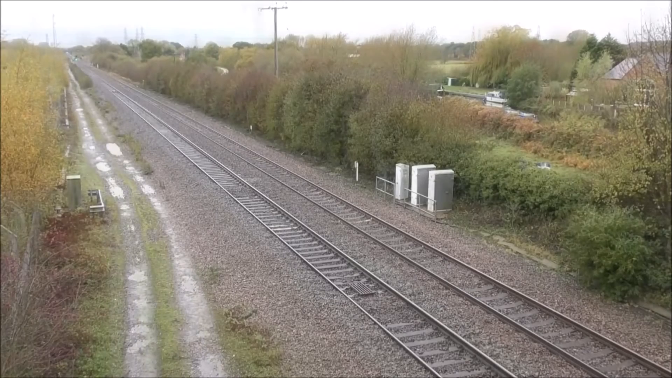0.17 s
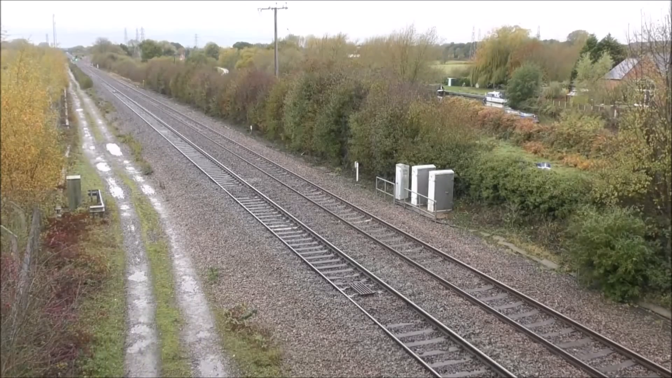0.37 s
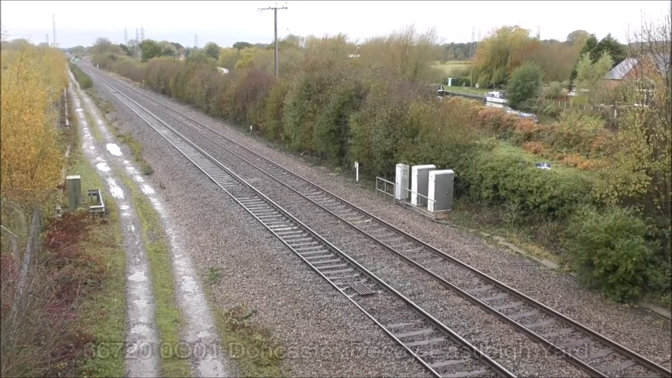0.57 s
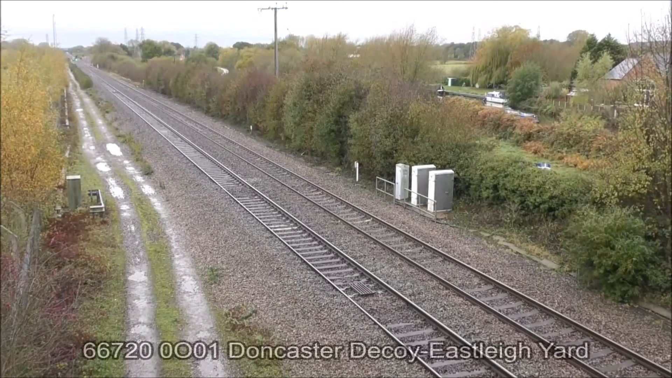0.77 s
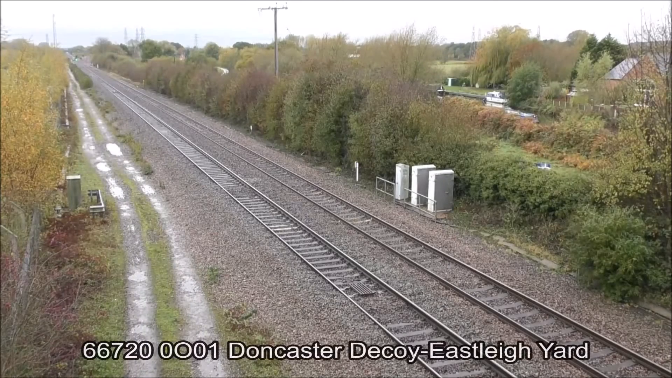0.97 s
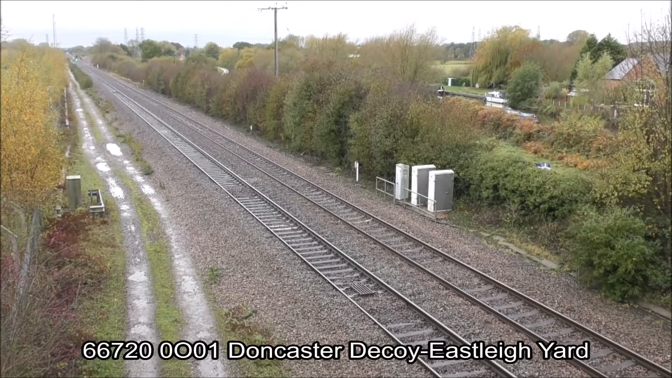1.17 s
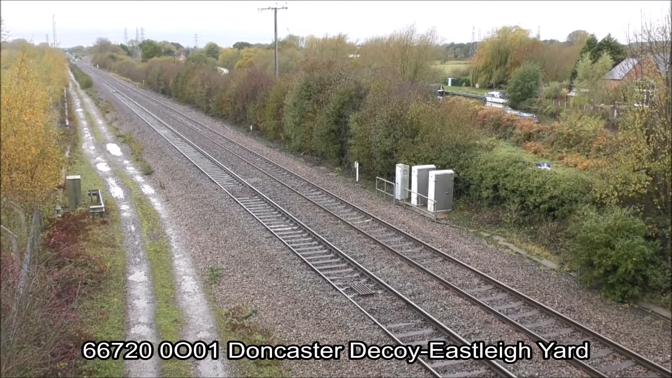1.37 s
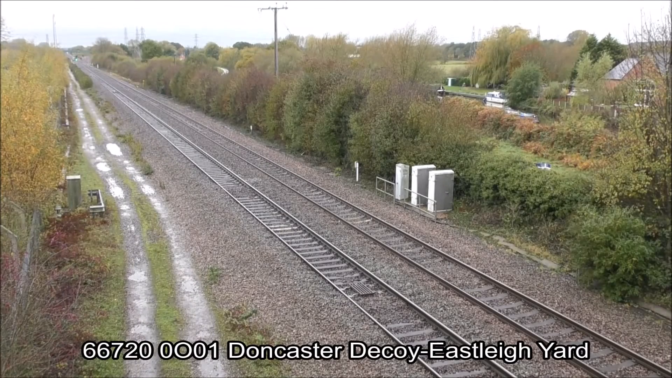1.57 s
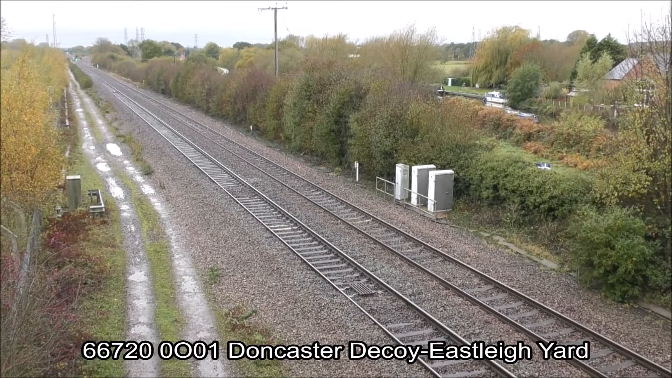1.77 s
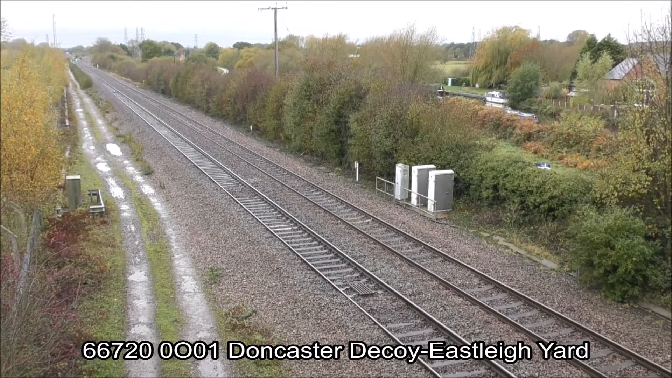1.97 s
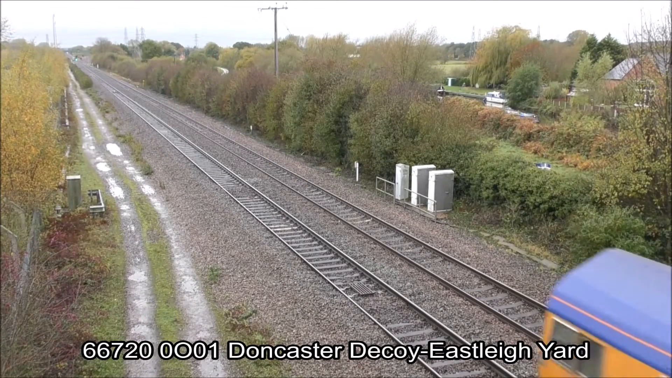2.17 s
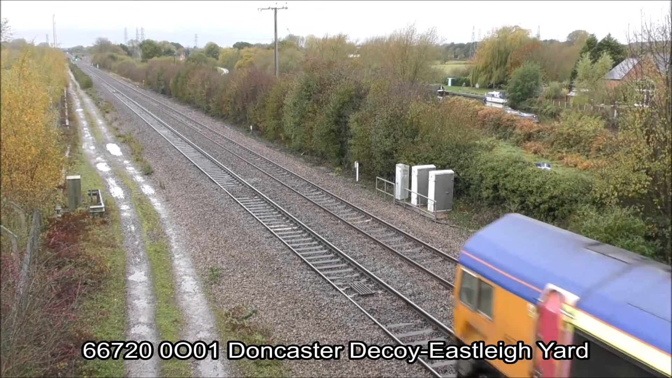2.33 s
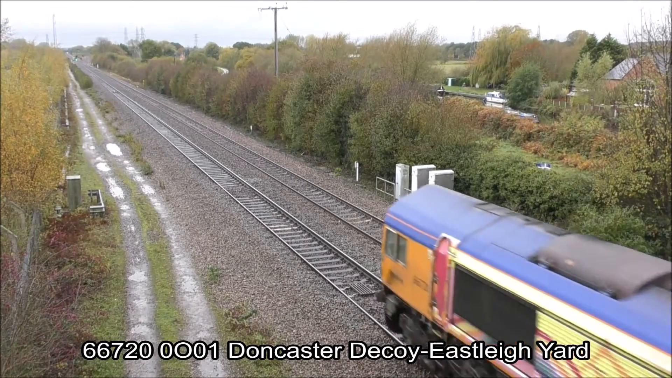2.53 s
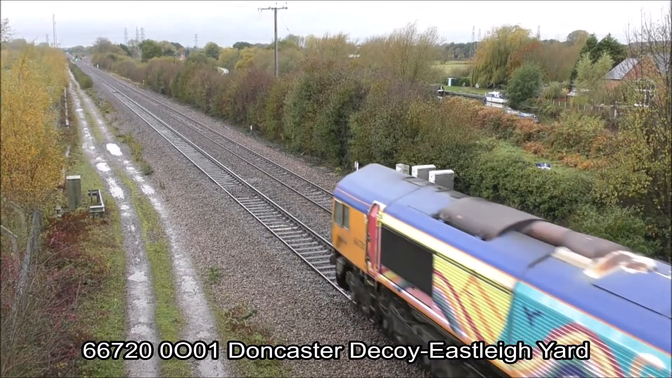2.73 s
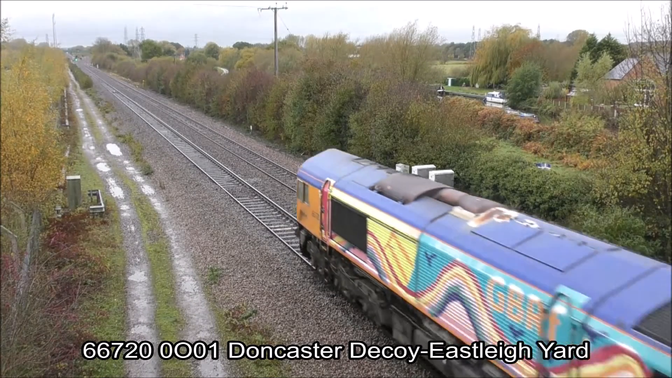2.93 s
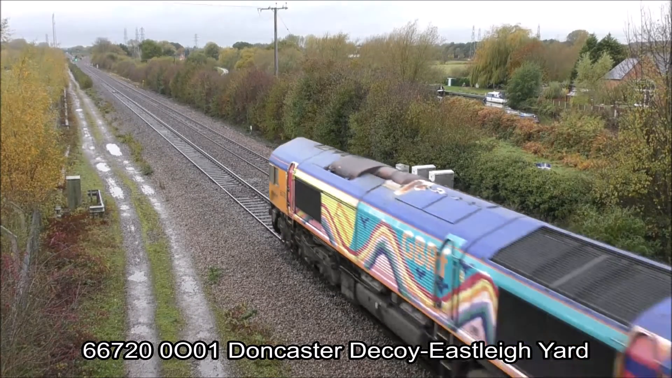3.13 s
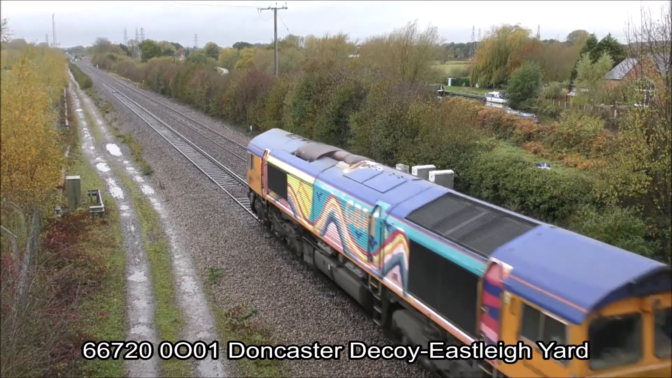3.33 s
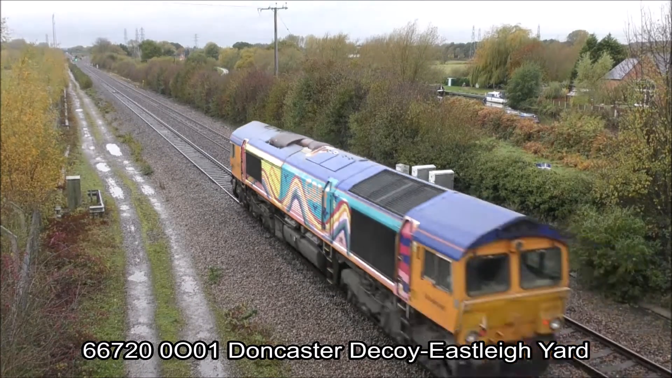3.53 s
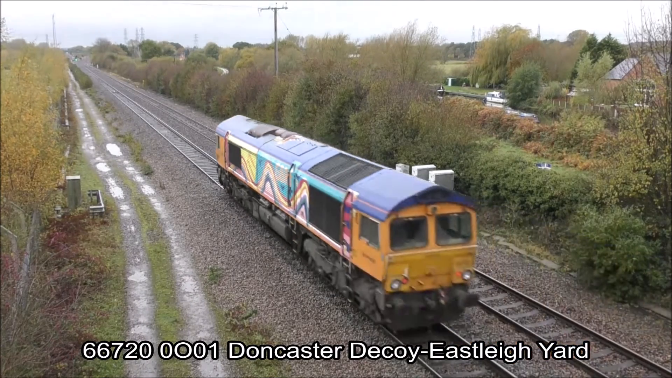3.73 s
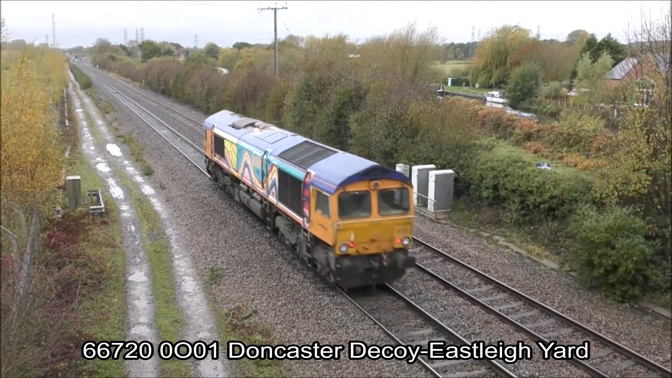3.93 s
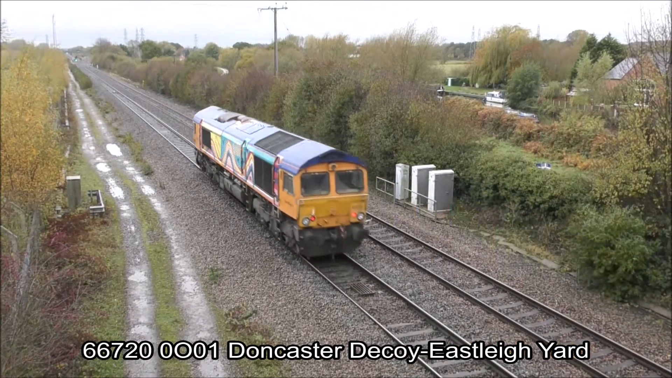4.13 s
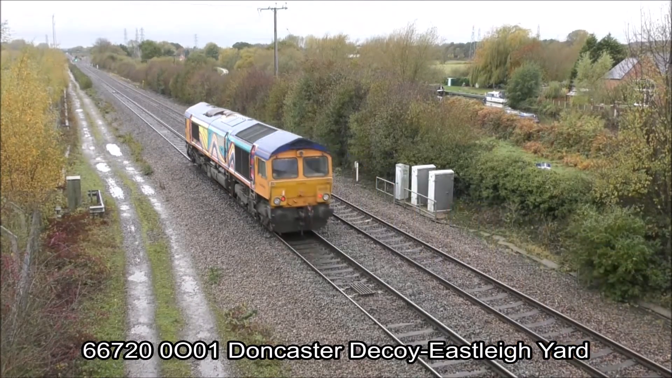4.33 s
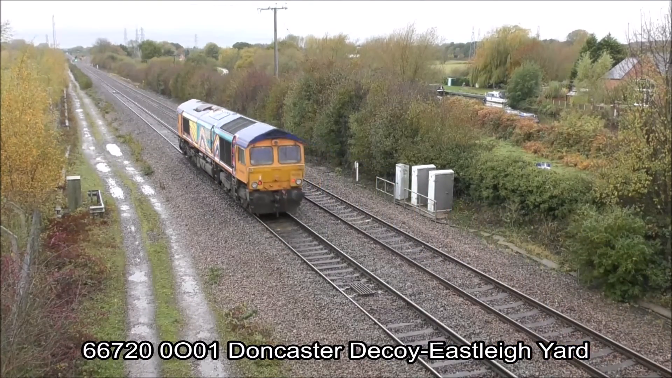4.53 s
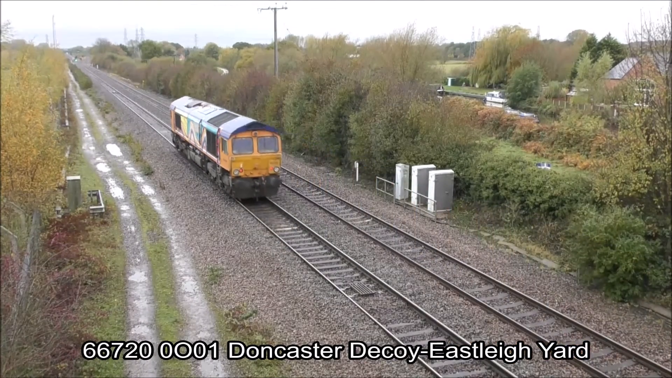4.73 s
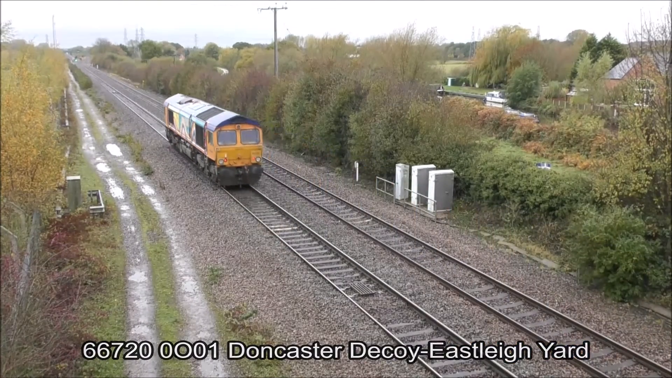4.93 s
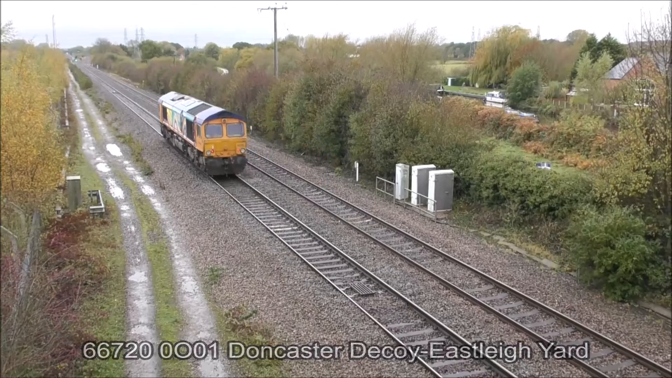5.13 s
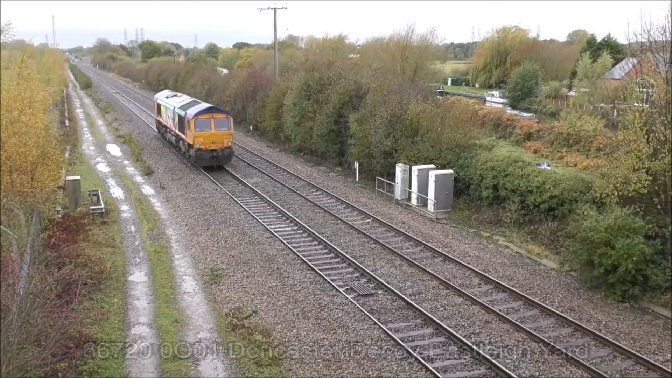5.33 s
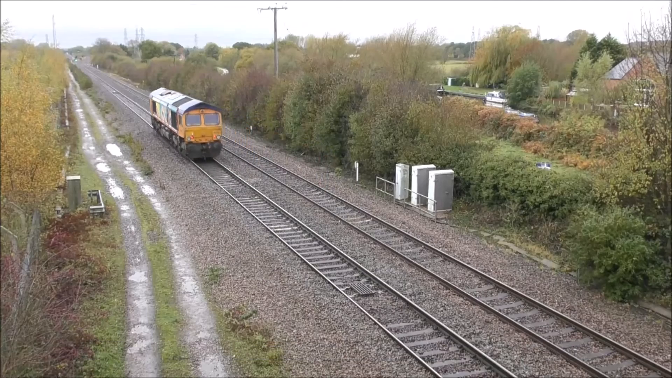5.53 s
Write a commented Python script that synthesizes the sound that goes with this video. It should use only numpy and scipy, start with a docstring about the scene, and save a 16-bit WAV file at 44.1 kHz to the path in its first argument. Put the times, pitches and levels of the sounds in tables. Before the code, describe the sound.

A lone diesel locomotive drones faintly, bursts out from under a bridge in a whining roar, then fades down the track as its pitch sags.

```python
"""First comes the faint drone of a light diesel locomotive, its running gear whining and roaring from behind.
It passes under the listener's bridge and draws away along the track, and its pitches sag as it goes by.
The exhaust is a set of sine waves at multiples of the shaft rate; the whine is a drifting sine wave.
The roar is coloured noise with resonances and machine tones; the turbocharger whistles with fuzzy lines.
Light gusts, made of low noise, touch the two microphone ports over faint background noise."""
import sys
import numpy as np
from scipy.fft import rfft, irfft, next_fast_len
from scipy.io import wavfile
from scipy.ndimage import map_coordinates

SR = 44100
rng = np.random.default_rng(int(sys.argv[2]) if len(sys.argv) > 2 else 0)


def waveform_to_disk(signal):
    """Save audio, clipped to [-1, 1], as 16-bit WAV at the path in sys.argv[1]."""
    frames = np.transpose(np.atleast_2d(signal))
    scaled = np.clip(frames, -1, 1) * 32767
    samples = np.round(scaled).astype(np.int16)
    wavfile.write(sys.argv[1], SR, samples)


N = 246519  # length in samples

# strongest exhaust order, dipping under the bridge: t/s, level/dB
MAIN_ORDER_LEVEL = [(0, -58), (1.15, -43.5), (1.4, -39), (1.55, -41), (1.6, -52), (1.71, -39), (1.8, -53),
                    (1.9, -47), (1.97, -47), (2.03, -63), (2.11, -37.5), (2.4, -35), (2.55, -33),
                    (2.8, -35.5), (3.3, -35), (3.6, -39.5), (4.2, -41), (5.59, -48)]
# shared level of the other exhaust orders: t/s, level/dB
OTHER_ORDERS_LEVEL = [(0, -52.5), (.6, -48), (1.9, -43.5), (2.04, -53), (2.2, -44), (2.6, -40.5),
                      (3.4, -43), (5.2, -45.5), (5.59, -52)]
# other shaft orders: multiple of the shaft rate, added level approaching/dB, added level leaving/dB
ORDERS_HEARD = [(6, -8, -19), (7, -13, -33), (10, -8.5, -14), (11, -11, -7.5), (12, -11.5, -10),
                (13, -10, -11.5), (14, -25, -3)]
# strongest order returning from the bridge: t/s, level/dB, half length/s
BRIDGE_ECHO = (1.93, -44, 0.08)
# how far the leaving colour has taken over: t/s, share (0-1)
PASSED = [(0, 0), (1.9, 0.13), (2.5, 0.99), (5.59, 0.92)]
# running-gear whine, swelling as axles beat: t/s, level of its pure line/dB
WHINE_LEVEL = [(0, -70.5), (.3, -62.5), (.8, -63), (.92, -54), (1.3, -56), (1.45, -51.5), (1.78, -57.5),
               (1.93, -47.5), (2.17, -48), (2.37, -37.5), (2.43, -44), (2.54, -31), (2.69, -30.5),
               (2.75, -44), (2.97, -32.5), (3.11, -43.5), (3.14, -30.5), (3.22, -45), (3.35, -26.5),
               (3.41, -40), (3.56, -32), (3.78, -44), (3.94, -36), (3.97, -46), (4.2, -33), (4.27, -42),
               (4.45, -33), (4.55, -42), (4.78, -36), (5.2, -43), (5.29, -56.5), (5.5, -40), (5.59, -44)]
# pitch above the leaving pitch: t/s, shift/%
DOPPLER = [(0, 11.5), (1.7, 11), (2.1, 10), (2.25, 8.5), (2.42, 4.5), (2.719, 2.5), (3.15, 1.68), (4, 0.4),
           (5.59, 0)]
# tones of gears and fans: leaving f/Hz, width/Hz, level against the body approaching, passing, leaving/dB
MACHINE_TONES = [(619, 26, -11.5, -14.5, -24), (902, 14, -13.5, -19.5, -19), (1225, 7, -32, -26, -7),
                 (1386, 22, -43, -10, -17), (1820, 40, -15, -15.5, -16), (2303, 22, -24, -15.5, -25),
                 (2740, 30, -25, -20, -29)]
# moments of approaching, passing and leaving: t/s
STAGES = (1.4, 3.24, 6.5)
# wheel and rail resonances of steady pitch, by stage of the pass: f/Hz, width/Hz, level against the body/dB
RINGS = {"coming": [(428, 6, -12.5), (424, 6.7, -17), (1238, 14, -12), (1656, 11, -20), (2320, 39, -17.5)],
         "clearing the bridge": [(640, 59, -14), (795, 19, -13.5), (1600, 26, -14), (1840, 30, -13),
         (2286, 30, -6), (2770, 30, -16)], "leaving": [(307.5, 8.7, -16.5), (386, 6.6, -10), (432, 9.7, -9),
         (794.5, 14, -16.5), (1250, 13, -14)]}
# rise and fall of the roar, one row each for rumble, body, upper body, hiss and air: turning point t/s,
# level before rounding/dB, rise/(dB/s), fall/(dB/s), rounding/s, bridge screening/dB, clear of it t/s, half length/s
ROAR_LEVELS = [(2.82, -35, 6.5, 3.5, 0.14, 7.5, 2.106, 0.19),
               (3.355, -33.5, 6.5, 3.5, 0.13, 8.5, 2.24, 0.23),
               (3.08, -34.5, 7.5, 3.5, 0.089, 8, 2.32, 0.18),
               (3.28, -55.5, 9.5, 4.5, 0.39, 4.5, 2.15, 0.13), (2.93, -64.5, 11, 4, 0.18, 5, 2.35, .06)]
# noise colours of the roar, from low to high: f/Hz, relative level/dB per Hz
RUMBLE = [(13, -42), (22, -40), (44, -4), (75, -7.5), (153, -1), (336, -6), (402, -2), (488, -11),
          (600, -28), (780, -37), (1320, -120)]
BODY_COMING = [(260, -23), (450, -10), (640, -5), (1000, -5), (1420, -5.5), (2380, -7), (4460, -19.5),
               (5500, -45), (9000, -90)]
BODY_LEAVING = [(260, -50), (450, -6.5), (600, -4), (850, -8), (1370, -4), (1850, -5), (4230, -14),
                (5500, -30.5), (9000, -89)]
HISS_COMING = [(3500, -36), (4700, -2), (5500, -7), (7000, -14), (9000, -18), (12000, -45)]
HISS_LEAVING = [(3500, -47), (4700, -6.5), (5500, -5), (6900, -13.5), (8500, -12), (12000, -32)]
AIR = [(7000, -11), (9500, -0.5), (12000, -4.5), (14500, -16), (15700, -22)]
# short dips and swells of the upper body: t/s, level change/dB, half length/s
FLICKER = [(0.156, -5, 0.037), (0.32, 5, .07), (4.2, 0.5, 0.27), (4.99, -2, .25)]
# brief drop of the rumble under the bridge: t/s, level change/dB, half length/s
BASS_GAP = (1.9, -8, 0.032)
# clearing the bridge: t/s, half length/s
EMERGING = (2.23, 0.24)
# left-right likeness in the open: f/Hz, likeness (0-1)
ALIKE = [(60, 0.74), (150, 0.97), (380, 1), (950, 0.97), (2380, 0.99), (4500, 0.92), (6000, 0.99),
         (8000, 1), (15000, .995)]
# left-right likeness while the bridge scatters the sound: f/Hz, likeness (0-1)
ALIKE_HIDDEN = [(450, 0.98), (1200, 0.93), (2500, 0.79), (4200, 0.56), (6000, 0.61), (8000, 0.97),
                (12000, 0.74)]
# puffs of wind: t/s, level/dB, half length/s
GUSTS = [(1.873, -47.5, 0.038), (2.45, -57, 0.12), (3.86, -39, 0.085), (5.562, -47, 0.021)]
# broad blade whistle of the turbocharger: t/s, level/dB
BLADE_LEVEL = [(0, -104), (1.5, -84), (1.9, -75.5), (2.2, -77), (2.36, -62), (2.55, -59), (2.85, -64),
               (3.05, -59.5), (3.45, -69), (3.75, -65), (4.1, -70), (4.35, -64), (4.9, -76), (5.59, -71)]
# thinner whistle from further back: t/s, level/dB
THIN_WHISTLE_LEVEL = [(0, -100), (1.7, -82), (2.1, -69), (2.4, -74), (2.56, -51), (2.65, -55), (2.71, -47),
                      (2.85, -51), (2.95, -60.5), (3.55, -51), (3.75, -65), (4, -50.5), (4.1, -65),
                      (4.7, -58.5), (5, -75), (5.59, -74)]
# colour of distant air and camera noise: f/Hz, relative level/dB per Hz
FLOOR = [(20, -20), (60, 5), (150, -1), (260, -14), (500, -24), (2000, -15.5), (4000, -37), (6000, -40),
         (15700, -49)]
# difference within the microphone pair: f/Hz, left over right level/dB, left lead/rad
PAIR = [(45.3, -7, .2), (72, -1, 0.14), (100, -0.5, 0.079), (200, 0, 0.026), (400, 0.44, 0.14),
        (1300, 0, -.1), (2400, -1, -0.054), (5000, 1, .05), (8000, -0.5, 0)]
# direction: t/s, share added on the left and taken off on the right
SWING = [(0, -0.037), (1.5, -0.048), (2.5, -0.34), (3.2, -0.12), (4.2, .05), (5.59, -0.096)]
# how much the capsules hear direction: f/Hz, share (0-1)
AIMED = [(300, 0.027), (1300, 0.35), (4200, 0.98), (6000, 0.04), (7500, 0.13)]

MAIN_ORDER = 9  # the strongest multiple of the shaft rate
EXHAUST_HZ, BLADE_HZ, THIN_HZ = 69.64, 7510, 4104  # leaving pitches
# the bass bends round the bridge and sags as in the open; MACH is speed over the speed of sound
EXHAUST_ABEAM_S, EXHAUST_SPREAD_S, MACH = 2.05, 0.495, .057
WHINE_COMING_HZ, WHINE_LEAVING_HZ, WHINE_DROP_S, WHINE_DROP_HALF_S = 419.9, 404.4, 2.17, .14
TURBO_LEAD_S, GEARS_LEAD_S = .07, .12  # these pass earlier than the thin whistle
BLADE_SAG = .9  # share of the shift heard in the blade whistle
TOP_HZ = 15690  # band limit


def amp(db):
    """Turn dB into a plain gain."""
    return 10 ** (np.asarray(db) / 20)


def unit(x):
    """Scale a sound to rms 1."""
    return x / np.sqrt(np.mean(x ** 2) + 1e-20)


def along(points, hz, order=0):
    """Read one value column of (f/Hz, value, ..) points on a log axis."""
    f, *values = np.transpose(points)
    return np.interp(np.log(hz + 1), np.log(f + 1), values[order])


def curves(rows):
    """Give one value per sample for each column after the time."""
    s, *cols = np.transpose(rows)
    return [np.interp(np.arange(N) / SR, s, c) for c in cols]


def wobble(rate):
    """Draw a smooth random curve with rate knots a second."""
    knots = rng.standard_normal(int(N * rate / SR) + 4)
    return map_coordinates(knots, [np.arange(N) * rate / SR])


def bump(s, half_s):
    """Draw a bell of height 1 around a moment."""
    return np.exp(-((np.arange(N) / SR - s) / half_s) ** 2)


def before(s, half_s):
    """Fall smoothly from 1 to 0 around a moment."""
    return (1 - np.tanh((np.arange(N) / SR - s) / half_s)) / 2


def passing(s, db, rise_db, fall_db, knee_s, screen_db, clear_s, half_s):
    """Level in dB: climbs to a rounded peak, falls away, and is held down until the bridge is cleared."""
    u = (np.arange(N) / SR - s) / knee_s
    slopes = rise_db * np.logaddexp(0, -u) + fall_db * np.logaddexp(0, u)
    return db - knee_s * slopes - screen_db * before(clear_s, half_s)


def doppler(lead_s, share=1):
    """Pitch ratio of a part that passes lead_s early: approaching sound is raised."""
    s, percent = np.transpose(DOPPLER)
    return 1 + share * np.interp(np.arange(N) / SR + lead_s, s, percent) / 100


def filtered(x, response):
    """Apply a response over frequency to x."""
    m = next_fast_len(N + 8192)
    spectrum = rfft(x, m) * response(np.fft.rfftfreq(m, 1 / SR))
    return irfft(spectrum, m)[..., :N]


def rush(gain, alike=ALIKE):
    """Stereo noise with the given gain over frequency and left-right likeness."""
    def mid_side_gain(hz):
        turn = np.arccos(np.clip(along(alike, hz), -1, 1)) / 2
        return gain(hz) * [np.cos(turn), np.sin(turn)]

    mid, side = filtered(rng.standard_normal((2, N)), mid_side_gain)
    return np.array([mid + side, mid - side])


def coloured(spectrum, alike=ALIKE):
    """Stereo noise of rms 1 with a (f/Hz, level/dB) spectrum."""
    return unit(rush(lambda hz: amp(along(spectrum, hz)) * (hz > 15), alike))


def phase(hz):
    """Add up a moving pitch into a phase in radians."""
    return 2 * np.pi * np.cumsum(hz) / SR


def narrow(hz, width_hz):
    """A fuzzy line of rms 1: slow noise, width_hz knots a second, riding a moving pitch."""
    return unit(wobble(width_hz) * np.cos(phase(hz)) + wobble(width_hz) * np.sin(phase(hz)))


def background():
    """Distant air and camera noise, less alike left and right in the upper middle."""
    alike = [(100, 0.89), (1000, 0.87), (3500, .3), (6000, 0.77), (8000, 0.83)]  # f/Hz, likeness
    return amp(-63.5) * coloured(FLOOR, alike)


def exhaust():
    """Uneven firing of the cylinders sounds as steady multiples of the shaft rate."""
    main_db, = curves(MAIN_ORDER_LEVEL)
    others_db, = curves(OTHER_ORDERS_LEVEL)
    passed, = curves(PASSED)
    t = np.arange(N) / SR
    x = (t - EXHAUST_ABEAM_S) / EXHAUST_SPREAD_S
    main_hz = EXHAUST_HZ * (1 + MACH * (1 - x / np.sqrt(1 + x * x)))
    shaft = phase(main_hz / MAIN_ORDER)
    out = amp(main_db + wobble(8.7) / 2) * np.sin(MAIN_ORDER * shaft)
    # the bridge echo keeps the approaching pitch
    echo_s, echo_db, echo_half_s = BRIDGE_ECHO
    out += amp(echo_db) * bump(echo_s, echo_half_s) * np.sin(2 * np.pi * main_hz[0] * t)
    for k, coming_db, leaving_db in ORDERS_HEARD:
        db = others_db + coming_db + passed * (leaving_db - coming_db) + 2 * wobble(4.24)
        drift = rng.uniform(0, 2 * np.pi) + 0.27 * wobble(2.83)
        out += amp(db) * np.sin(k * shaft + drift)
    return np.sqrt(2) * out  # makes the levels rms


def whine():
    """A nearly pure line whose phase drifts as several axles beat."""
    drop_hz = WHINE_COMING_HZ - WHINE_LEAVING_HZ
    hz = WHINE_LEAVING_HZ + drop_hz * before(WHINE_DROP_S, WHINE_DROP_HALF_S)
    db, = curves(WHINE_LEVEL)
    line = np.sqrt(2) * np.sin(phase(hz) + .5 * wobble(8))
    return amp(db) * (line + 0.29 * narrow(hz, width_hz=25))


def machinery():
    """Fuzzy tones of gears and fans, all bent by the same Doppler shift."""
    ratio = doppler(GEARS_LEAD_S)
    t = np.arange(N) / SR
    out = 0
    for hz, width_hz, *stage_db in MACHINE_TONES:
        db = np.interp(t, STAGES, stage_db) + 0.4 * wobble(2.76)
        out = out + amp(db) * narrow(hz * ratio, width_hz)
    return out


def rings(modes, alike):
    """Noise from wheel roughness heard through narrow resonances, weaker above 4 kHz."""
    def gain(f):
        # each resonance is scaled so that its dB is its rms before the treble loss
        power = sum(amp(2 * db) * w / np.pi * SR / 4 / ((f - c) ** 2 + w * w / 4) for c, w, db in modes)
        return np.sqrt(power / (1 + (f / 4000) ** 4))

    return rush(gain, alike)


def roar():
    """Engine, fans and wheels: the colour turns over as the machine goes by."""
    rumble_db, body_db, upper_db, hiss_db, air_db = (passing(*row) for row in ROAR_LEVELS)
    flicker_db = sum(db * bump(s, half_s) for s, db, half_s in FLICKER)
    gap_s, gap_db, gap_half_s = BASS_GAP
    passed, = curves(PASSED)

    def turn(coming, leaving):
        return np.sqrt(1 - passed) * coming + np.sqrt(passed) * leaving

    shared_db = 0.067 * wobble(5.02)
    flutter_db = 0.91 * wobble(10)
    coming = coloured(BODY_COMING, ALIKE_HIDDEN) + rings(RINGS["coming"], ALIKE_HIDDEN)
    leaving = coloured(BODY_LEAVING) + rings(RINGS["leaving"], ALIKE)
    body = turn(coming, leaving) + machinery()
    body += bump(*EMERGING) * rings(RINGS["clearing the bridge"], ALIKE)
    # air and screening take the part above about 1600 Hz first
    upper = filtered(body, lambda hz: 1 / (1 + (1600 / (hz + 1)) ** 4))
    body = amp(body_db) * (body - upper) + amp(upper_db + flicker_db) * upper
    hiss = turn(coloured(HISS_COMING, ALIKE_HIDDEN), coloured(HISS_LEAVING))
    rumble_db = rumble_db + gap_db * bump(gap_s, gap_half_s) + wobble(4.9)
    out = amp(rumble_db) * coloured(RUMBLE) + amp(shared_db) * body
    out += amp(hiss_db + shared_db + flutter_db) * hiss
    return out + amp(air_db + flutter_db) * coloured(AIR)


def gusts():
    """Short puffs of wind: low noise, different at each port."""
    swell = sum(amp(db) * bump(s, half_s) for s, db, half_s in GUSTS)
    colour = [(20, -20), (60, -8), (160, 0), (320, -16), (1000, -90)]  # f/Hz, level/dB
    return swell * coloured(colour, alike=[(50, 0.43)])


def turbo():
    """A broad blade whistle with its octave, and a thin, slightly unsteady one below it."""
    hz = BLADE_HZ * doppler(TURBO_LEAD_S, BLADE_SAG)
    thin_hz = THIN_HZ * doppler(0)
    blade_db, = curves(BLADE_LEVEL)
    thin_db, = curves(THIN_WHISTLE_LEVEL)
    blade = narrow(hz, width_hz=450) + 0.56 * narrow(hz + 40 * wobble(5.4), width_hz=160)
    blade += amp(-22) * narrow(2 * hz, width_hz=900)  # octave
    thin = np.sin(phase(thin_hz + 9 * wobble(20))) + 0.65 * narrow(thin_hz, width_hz=60)
    return amp(blade_db + wobble(10.2)) * blade + amp(thin_db + 1.5 * wobble(13)) * thin


def scene():
    """Add up the locomotive, the wind and the background."""
    return background() + exhaust() + whine() + roar() + gusts() + turbo()


def record(dry):
    """Direction tips the upper middle left or right; the capsules differ a little; the band limit cuts the top."""
    swing, = curves(SWING)
    aimed = swing * filtered(dry.mean(axis=0), lambda hz: along(AIMED, hz))

    def capsules(hz):
        # each side takes half of the difference
        half = amp(along(PAIR, hz) / 2) * np.exp(.5j * along(PAIR, hz, order=1))
        return np.array([half, 1 / half]) * (hz < TOP_HZ)

    return filtered(dry + np.array([aimed, -aimed]), capsules)


dry = scene()
out = record(dry)
waveform_to_disk(out)
```